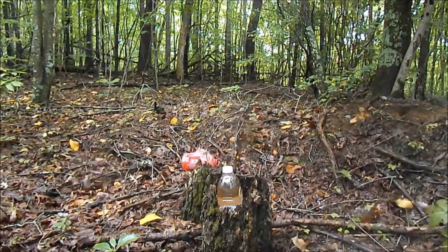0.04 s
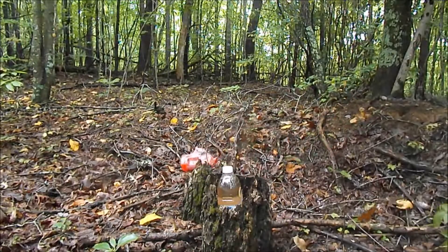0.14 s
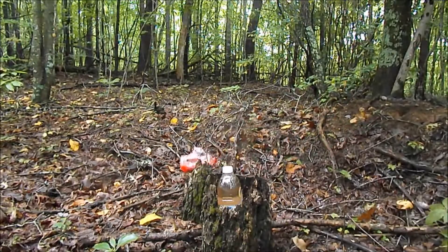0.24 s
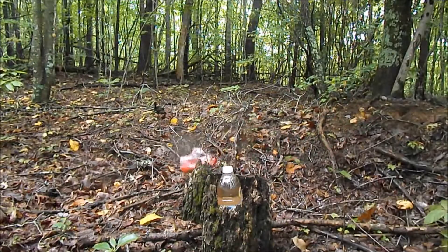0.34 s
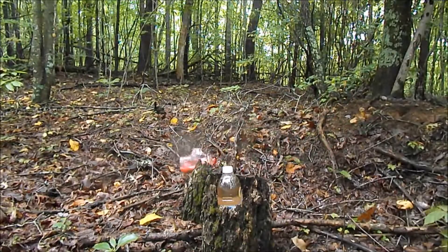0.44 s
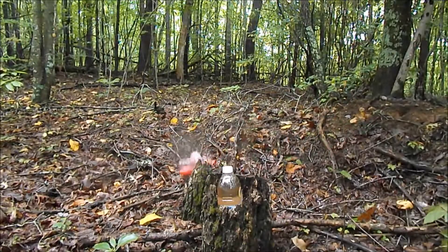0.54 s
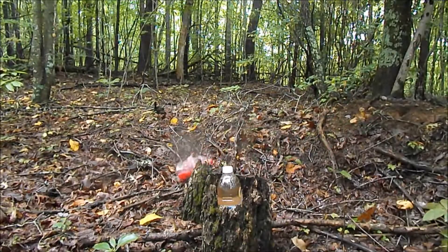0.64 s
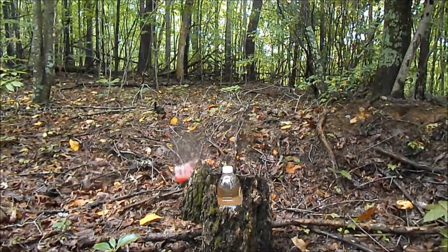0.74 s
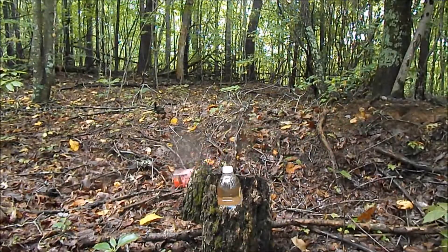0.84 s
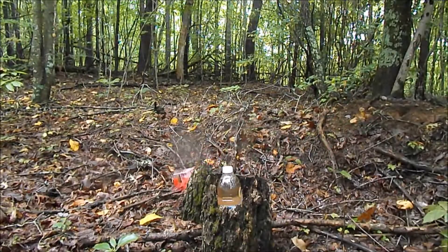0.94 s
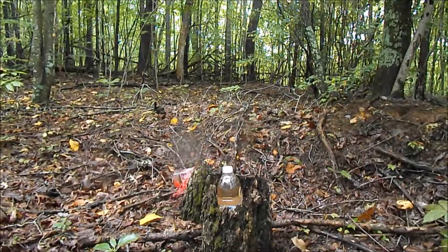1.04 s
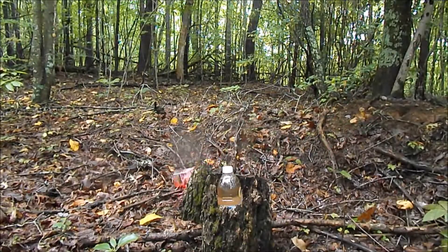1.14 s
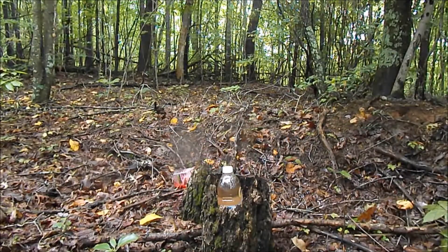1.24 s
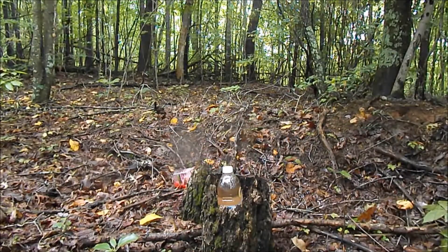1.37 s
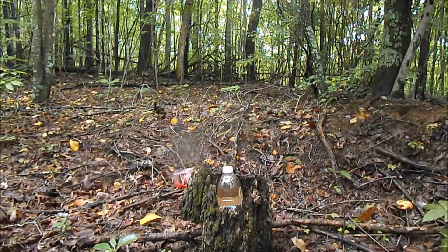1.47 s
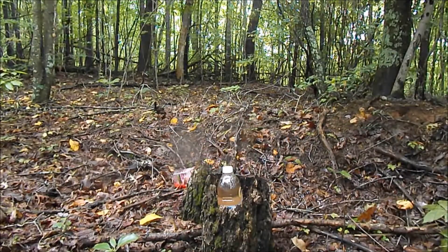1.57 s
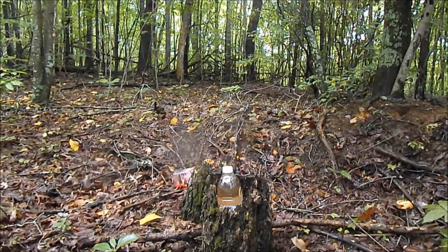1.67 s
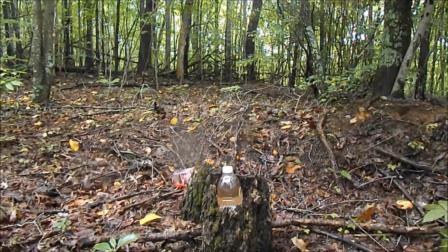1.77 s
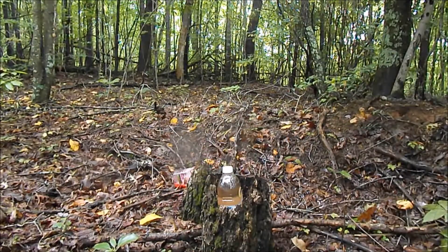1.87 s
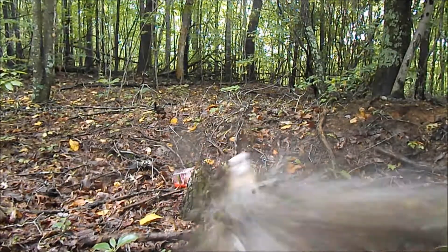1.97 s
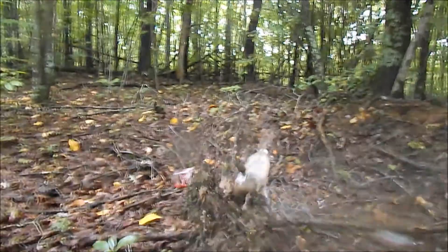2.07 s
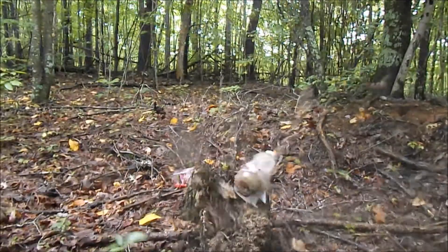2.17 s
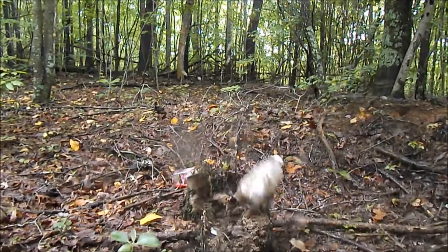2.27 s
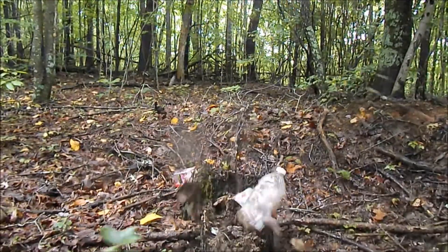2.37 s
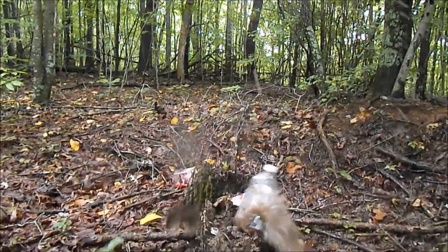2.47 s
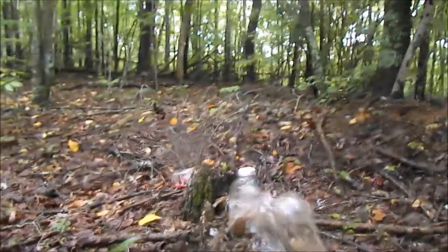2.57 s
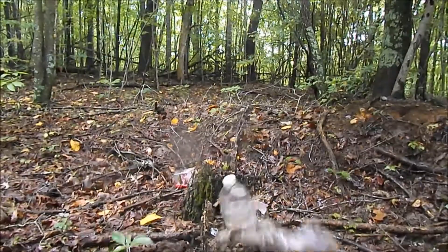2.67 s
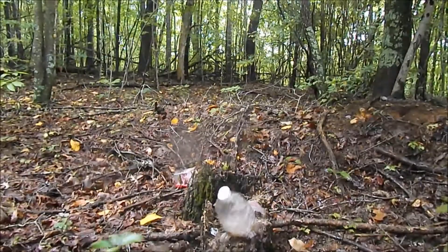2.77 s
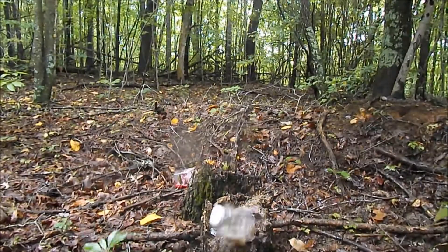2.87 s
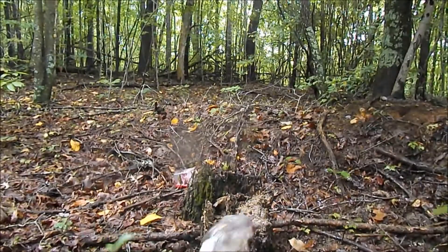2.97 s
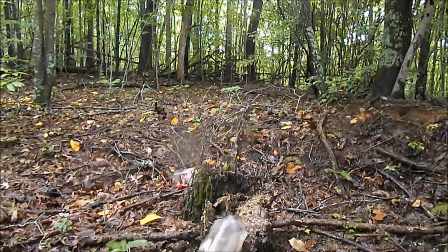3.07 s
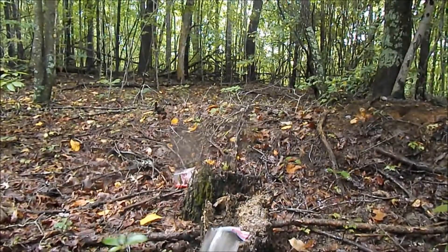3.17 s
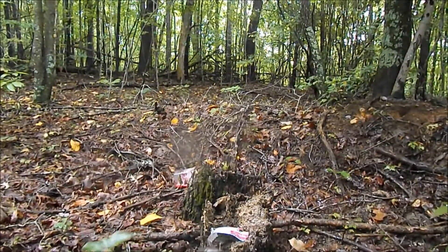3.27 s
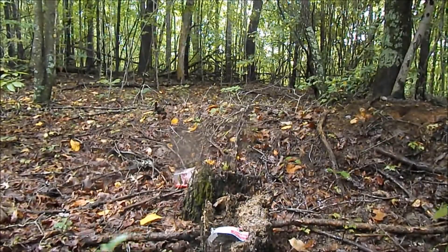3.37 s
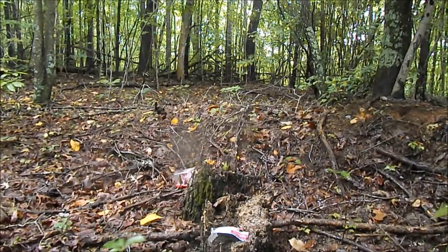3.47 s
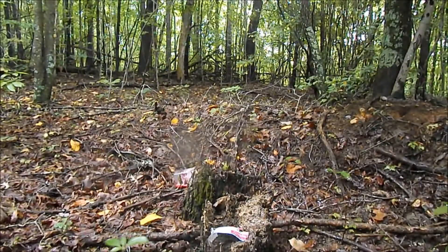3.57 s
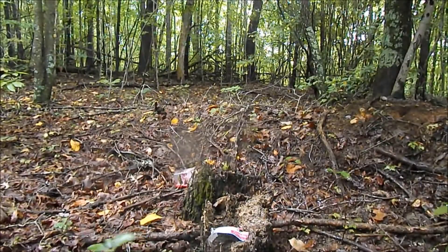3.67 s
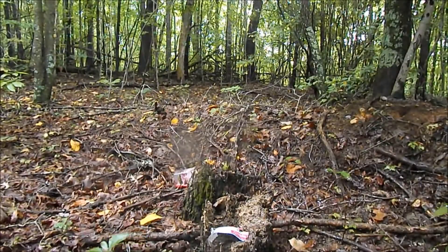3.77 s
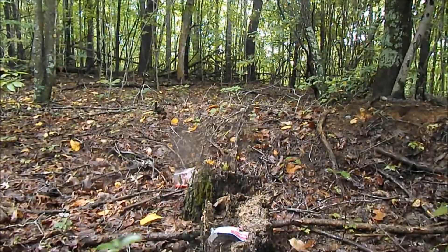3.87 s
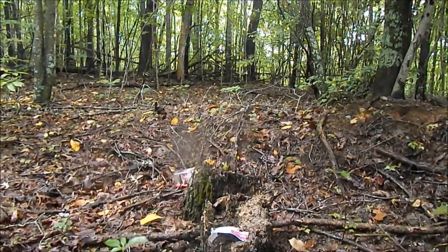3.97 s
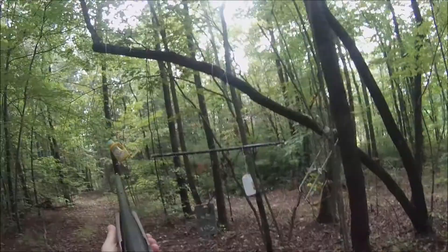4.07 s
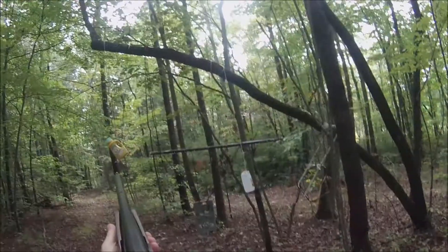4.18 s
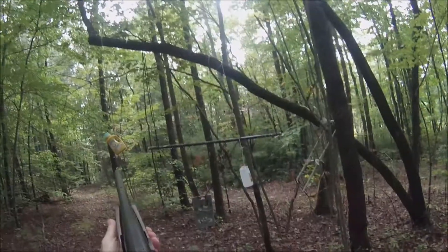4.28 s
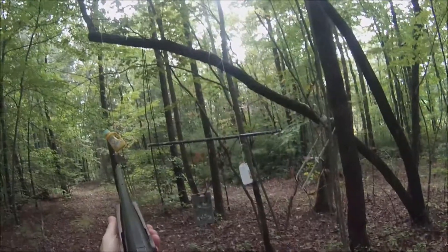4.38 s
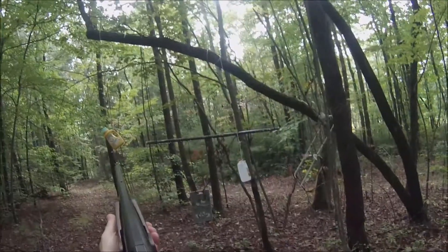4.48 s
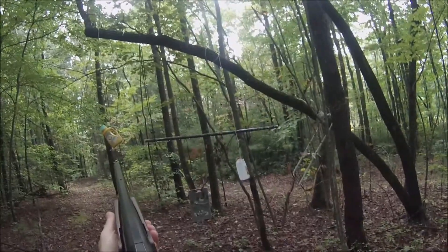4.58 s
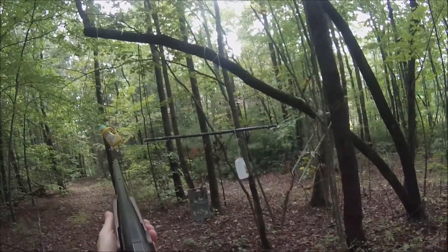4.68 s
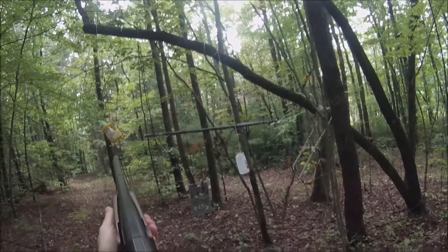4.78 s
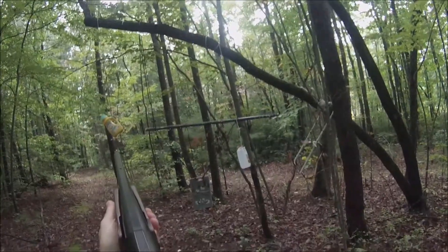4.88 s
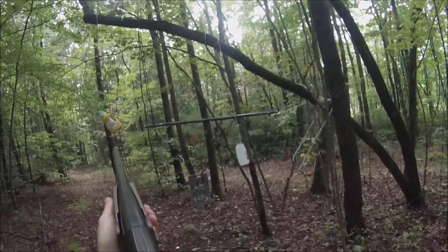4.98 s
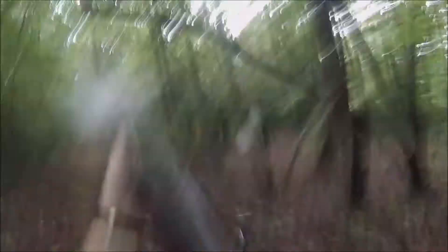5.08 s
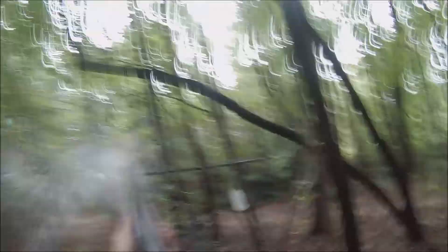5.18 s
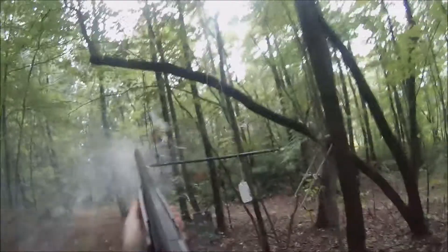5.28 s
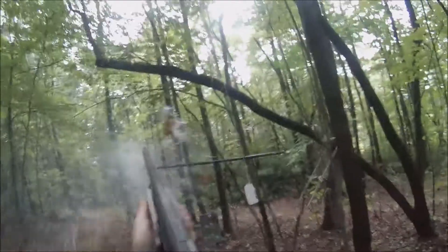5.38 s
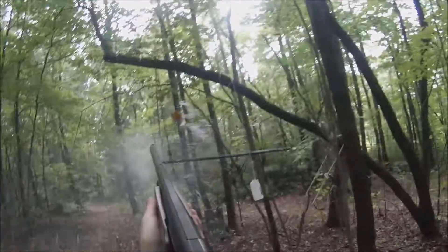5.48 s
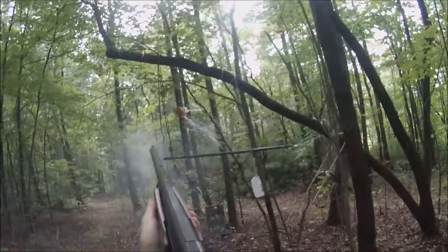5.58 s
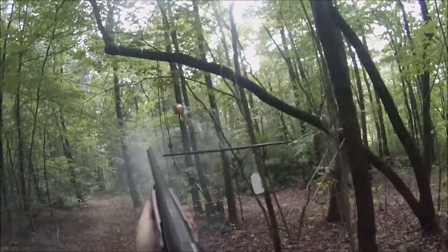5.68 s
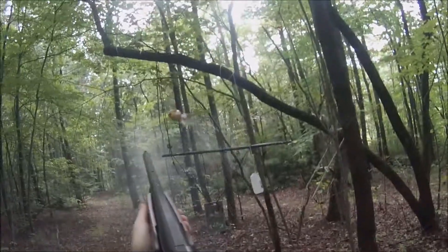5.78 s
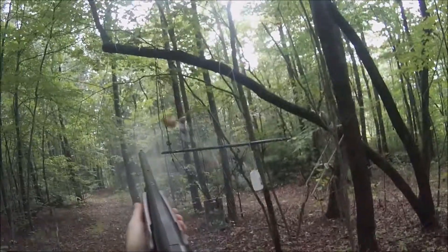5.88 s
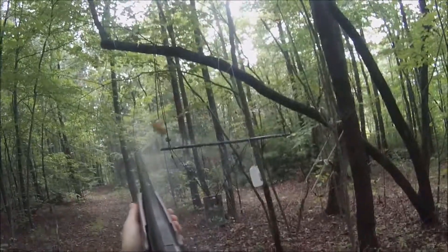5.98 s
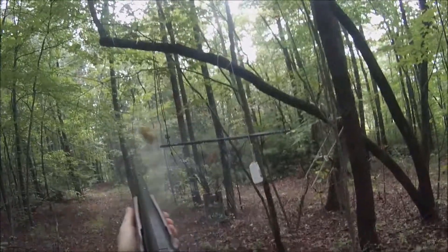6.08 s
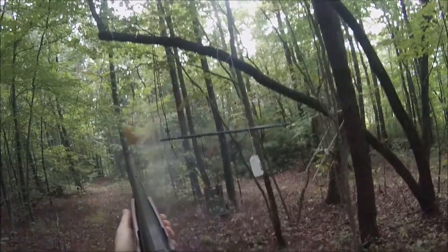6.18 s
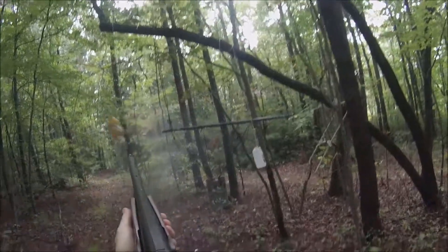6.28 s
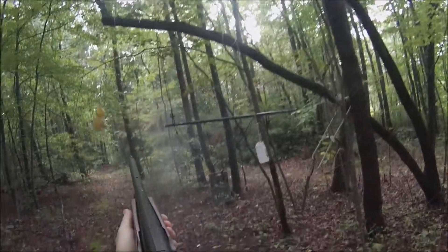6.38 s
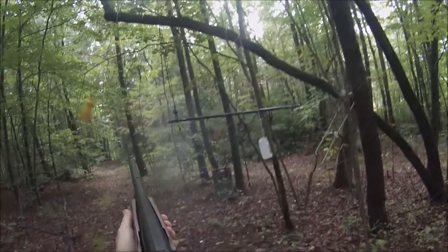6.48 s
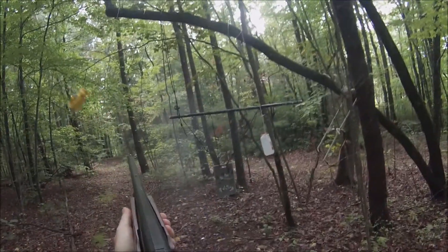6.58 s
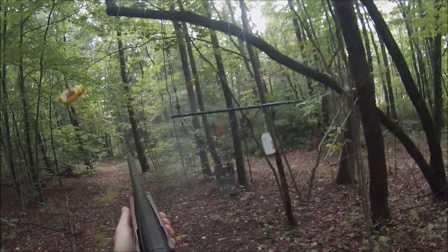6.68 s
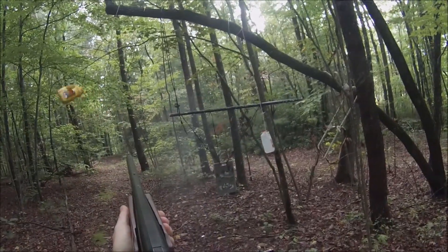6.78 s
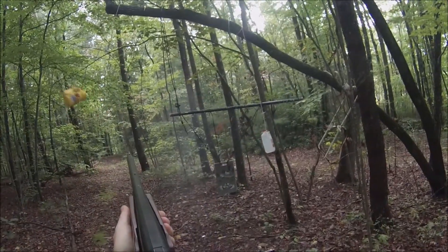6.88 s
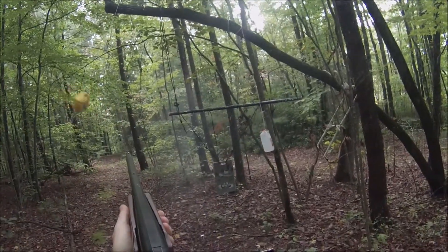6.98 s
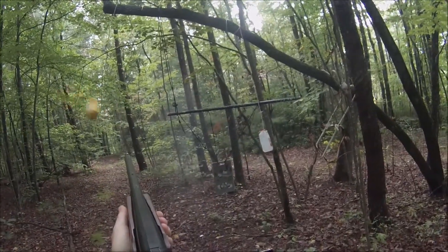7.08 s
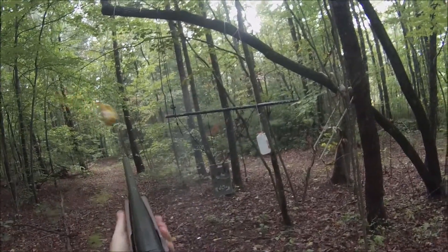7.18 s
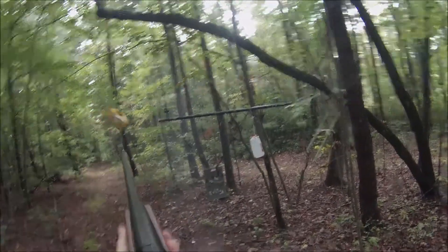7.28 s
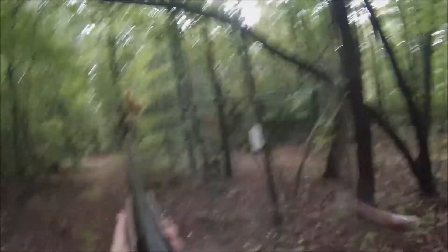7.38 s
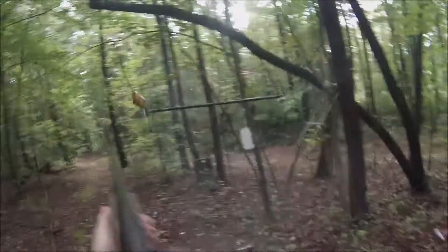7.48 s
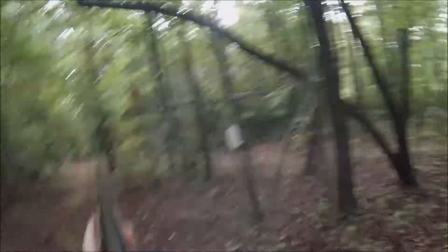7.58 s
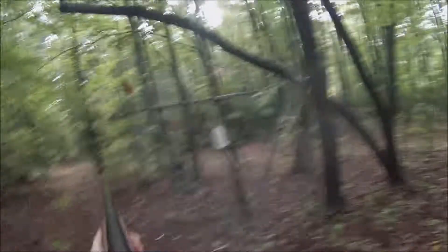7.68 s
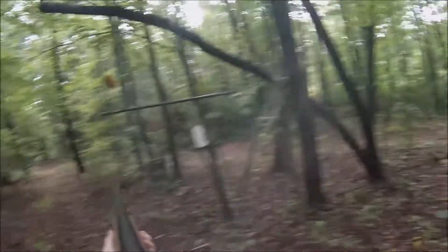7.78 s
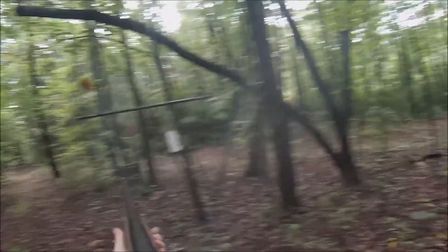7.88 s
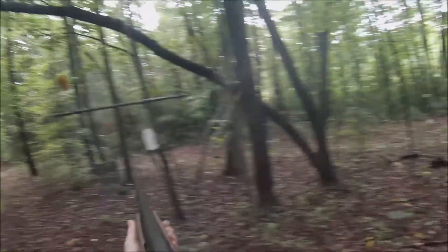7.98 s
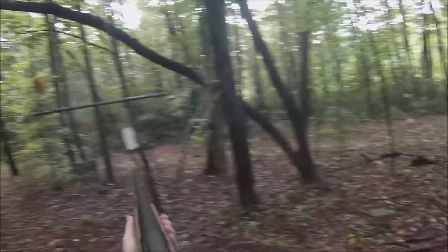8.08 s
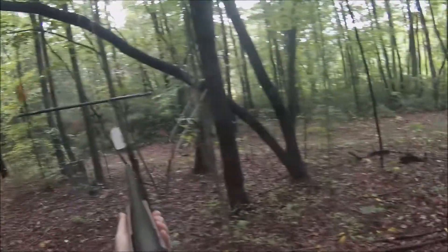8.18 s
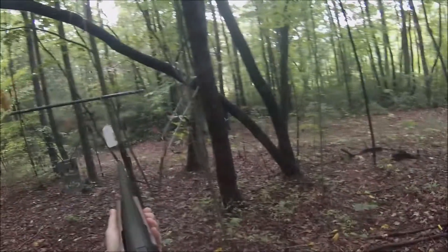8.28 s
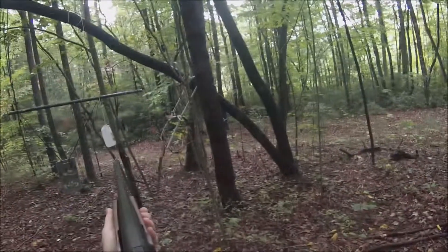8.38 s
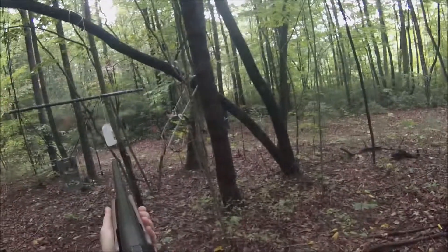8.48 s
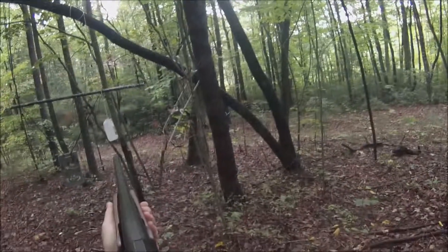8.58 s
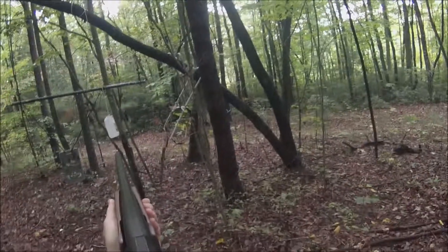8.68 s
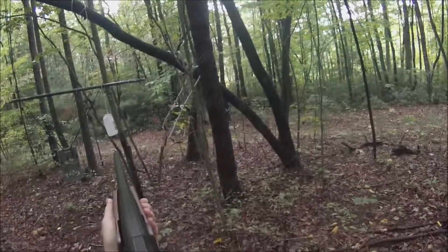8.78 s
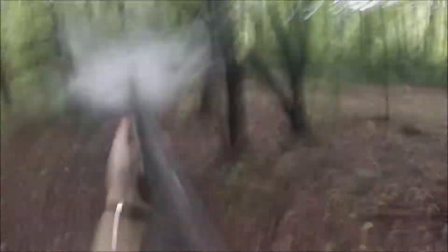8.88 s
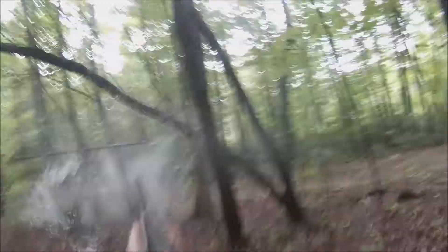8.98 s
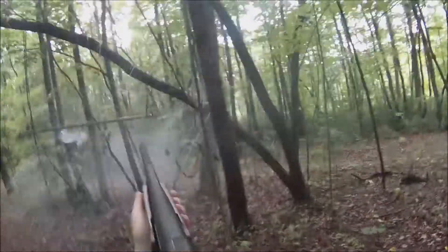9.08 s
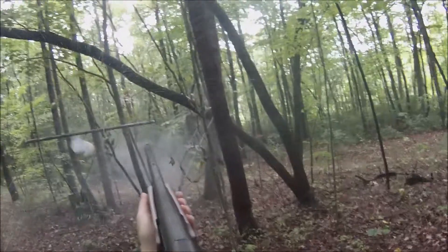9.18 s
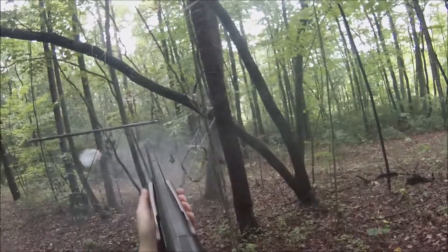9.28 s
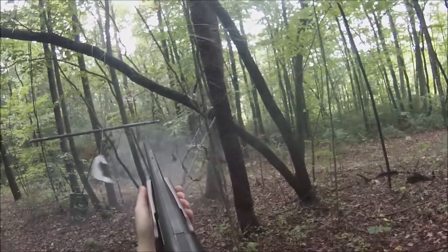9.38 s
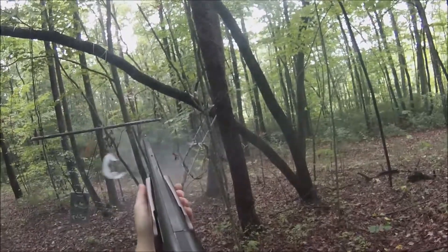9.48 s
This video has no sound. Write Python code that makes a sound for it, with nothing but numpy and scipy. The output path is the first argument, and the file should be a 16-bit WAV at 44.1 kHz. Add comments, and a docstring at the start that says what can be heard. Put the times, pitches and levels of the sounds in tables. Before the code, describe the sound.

Distant shotgun blast with loud echo and debris pattering on leaves, a sharp crack, then two close-up shots rolling hollowly through trees.

```python
"""A wood, heard from two places in turn; a pump shotgun is fired in it. First beside a stump: the echo of one
shot dies, the action is racked, the next shot throws debris and a bottle into the leaves, a sharp crack follows.
Then at the shooter's head: two overloading blasts with the pump worked between them. Shots are pressure pulses
plus gas noise, echoes are coloured grains, steel and debris are noise bursts through resonances, leaves are
ticks; insects are narrow noise over a bed of air."""
import sys
import numpy as np
from scipy import signal
from scipy.fft import rfft, irfft
from scipy.io import wavfile

SR = 44100
rng = np.random.default_rng(int(sys.argv[2]) if len(sys.argv) > 2 else 0)


def wrap_up_sound(samples):
    """Save the sound to the file named by the first command line argument, as 16-bit audio."""
    columns = np.atleast_2d(samples).T
    # keep every value between -1 and 1, then stretch to whole-number steps
    tamed = np.clip(columns, -1, 1)
    steps = np.round(tamed * 32767).astype(np.int16)
    wavfile.write(sys.argv[1], SR, steps)


N = 420713
T = np.arange(N) / SR


def blasts(shots, fronts, gas, low_hz, high_hz, thump_db):
    """Every shot arrives as the same fronts, each a pressure jump with a suction phase and a short roar of gas."""
    pulses, roar = np.zeros(N), np.zeros(N)
    for s, db, weight_db in shots:
        for lag_s, pulse_db, length_ms, roar_db, decay_ms in fronts:
            age = T[:2000] * 1000 / length_ms
            pulse = (1 - age) * np.exp(-age)
            add(pulses, s + lag_s, undb(db + weight_db + pulse_db) * pulse)
            add(roar, s + lag_s, undb(db + roar_db) * burst(decay_ms))
    # the microphone housing rounds each jump into a thud; some deep pressure passes straight through
    thud = 2 * butter(pulses, [low_hz, high_hz], "band")
    deep = butter(butter(pulses, 40, "low", order=1), 130, "low")
    return thud + undb(thump_db) * deep + colour(roar, gas)


# shots: t/s, level/dB, extra level of the pressure pulses/dB
STUMP_SHOTS = [(-0.64, 0, 0), (1.8755, -0.5, -1)]
# direct and reflected fronts: t after shot/s, relative pulse level/dB, pulse length/ms, gas level/dB, gas decay/ms
STUMP_FRONTS = [(0, -20, 1, 3, 3.9), (.008, -18.5, 0.35, -1.5, 8.7), (.019, -1, .23, -18.5, 4)]
# colour of the muzzle gas: f/Hz, relative level/dB
STUMP_GAS = [(40, -2.5), (200, -22.5), (600, 1.5), (2000, 5), (5000, 1), (9000, -3), (15000, -1.5)]


def stump_blasts():
    """Reports of the distant gun."""
    return blasts(STUMP_SHOTS, STUMP_FRONTS, STUMP_GAS, low_hz=200, high_hz=3000, thump_db=7)


# shots: t/s, level/dB, extra level of the pressure pulses/dB
SHOOTER_SHOTS = [(5.0688, 0.3, 1), (8.8549, 1.44, -1.3)]
# fronts from muzzle, ground, near trunks: t after shot/s, relative pulse level/dB, length/ms, gas/dB, decay/ms
SHOOTER_FRONTS = [(0, -13, 0.54, -2.5, 4.2), (.0045, -6, 1, 1, 1.6), (0.0105, -9.5, .85, -27.5, 3.5),
                  (0.0163, -1, .54, -8.5, 1.6), (.0202, -8, .37, -33.5, 5), (.038, -10.5, 0.51, -36, 5),
                  (0.0509, -16, 0.49, -30, 4)]
# colour of the muzzle gas: f/Hz, relative level/dB
SHOOTER_GAS = [(40, -14), (200, -2), (550, -2.5), (1300, -4), (2400, -0.5), (3400, 2), (4400, -8.5),
               (6300, -2.5), (8500, -19), (15000, -21)]


def shooter_blasts():
    """Hard, short blasts close behind the gun."""
    return blasts(SHOOTER_SHOTS, SHOOTER_FRONTS, SHOOTER_GAS, low_hz=329, high_hz=1010, thump_db=18)


def echoes(shots, waves, spectrum, dulling_db_per_octave, mellow_s, dull_s, spread_db):
    """Countless trunks return each shot; the longer the path, the more treble the foliage takes."""
    out, age = np.zeros(N), T[:3 * SR]
    strength = swells([(0, *wave) for wave in waves], age)
    path = np.tanh(age / dull_s) - np.tanh(mellow_s / dull_s)  # 0 at mellow_s
    octave = np.log2(np.clip(np.fft.rfftfreq(len(age), 1 / SR), 500, 16000) / 500)
    for s, db, _ in shots:
        returns = rfft(colour(grains(spread_db, 12000)[:len(age)], spectrum))
        wash = np.zeros(len(age))
        for k in range(6):
            band = irfft(returns * np.maximum(1 - abs(octave - k), 0))
            wash += band * undb(-dulling_db_per_octave * (k - 1) * path)
        add(out, s, undb(db) * strength * wash)
    return out


# near trunks, surrounding stand, far wood: level/dB, attack/s, fall/(dB/s)
STUMP_ECHO = [(-11, 0.061, 33), (-7, .41, 47.5), (-52.5, 1.6, 29.5)]
# colour of the echo: f/Hz, relative level/dB
STUMP_WOOD = [(24, -59.5), (40, -52.5), (218, -38.5), (397, -10.5), (509, -5.5), (606, -3.5), (1050, -4),
              (1160, -2), (1820, 0), (2110, -2), (3140, 1), (4800, -3), (7710, -8.5), (13700, -22),
              (15500, -28.5)]


def stump_echo():
    """Echo as strong as the report; it overloads the microphone."""
    roll = echoes(STUMP_SHOTS, STUMP_ECHO, STUMP_WOOD,
                  dulling_db_per_octave=4.5, mellow_s=0.17, dull_s=0.39, spread_db=0)
    overload = undb(-2)
    return np.clip(roll, -overload, overload)


# near trunks, surrounding stand, far wood: level/dB, attack/s, fall/(dB/s)
SHOOTER_ECHO = [(-17, .002, 280), (-26.5, 0.23, 41), (-39.5, 0.49, 11.44)]
# colour of the echo: f/Hz, relative level/dB
SHOOTER_WOOD = [(59, -54.5), (100, -39.5), (228, -16.5), (287, -7), (403, -0.5), (614, 1), (917, -12),
                (1180, -17), (2130, -13), (3460, -15), (3850, -22), (6260, -19.5), (7250, -26.5),
                (13400, -45), (15500, -48.5)]


def shooter_echo():
    """Long hollow roll."""
    return echoes(SHOOTER_SHOTS, SHOOTER_ECHO, SHOOTER_WOOD,
                  dulling_db_per_octave=4.5, mellow_s=0.22, dull_s=0.8, spread_db=1.5)


# microphone buffeted by the kick, then by rocking forward: t after shot/s, level/dB, attack/s, fall/(dB/s)
RECOIL = [(0, -48, 0.00299, 106), (.09, -46.5, 0.11, 230)]


def recoil():
    """Low noise as the recoil kicks the shooter back and he rocks forward."""
    out = np.zeros(N)
    for s, db, _ in SHOOTER_SHOTS:
        buffet = colour(rng.standard_normal(SR), [(50, -3.5), (120, -6.5), (500, -36), (2000, -80)])
        add(out, s, undb(db) * swells(RECOIL, T[:SR]) * buffet)
    return out


# modes of receiver and barrel: f/Hz, width/Hz, relative level/dB
STEEL_MODES = [(894, 80, -4), (1740, 75, -1), (2020, 85, 0), (2230, 85, -2), (3140, 75, -3), (3390, 80, -4),
               (4450, 140, -1), (5840, 80, -3), (6100, 130, -2), (7530, 90, -7), (9860, 150, -7),
               (12200, 180, -8)]


def action(strikes, rubbing, spectrum, ring_db):
    """Bolt, lifter and slide strike and rub; each blow lands elsewhere and favours other modes of the receiver."""
    sound = rubbing + undb(ring_db) * resonate(rubbing, STEEL_MODES)
    rings = np.array([undb(db) * mode(hz, width) for hz, width, db in STEEL_MODES])
    mode_shares = rng.standard_normal((len(strikes), len(STEEL_MODES)))
    for (s, db, decay_ms), shares in zip(strikes, mode_shares):
        contact = undb(db) * burst(decay_ms)
        add(sound, s, contact + undb(ring_db) * through(contact, unit(shares @ rings)))
    return colour(sound, spectrum)


def sliding(strokes, spread_db):
    """Stick-slip of the fore-end on its tube: it grows as the hand speeds up and dies at the stop."""
    gain = np.zeros(N)
    for s, length_s, db in strokes:
        speed = np.clip((T - s) / length_s, 0, 1)
        past_stop_s = np.maximum(T - s - length_s, 0)
        gain += undb(db) * speed ** 2 * undb(-200 * past_stop_s)  # falls 200 dB/s
    return gain * grains(spread_db, 3000)


# colour of the tails that nearer trunks return: f/Hz, relative level/dB
ACTION_ECHO = [(200, -36.5), (500, -16.5), (1300, -11), (2400, -1), (3700, 5), (5500, 2), (8000, -0.5),
               (13000, -9), (15500, -16.5)]


def thicket(x, low_t60_s, high_t60_s, build_s, treble_db, split_hz, spectrum=ACTION_ECHO):
    """The nearer trunks answer small bright sounds with a hissing tail whose treble dies first."""
    t = T[:SR]
    build = 1 - np.exp(-t / build_s)
    low = diffuse(x, np.exp(-np.log(1000) * t / low_t60_s) * build)
    high = diffuse(x, np.exp(-np.log(1000) * t / high_t60_s) * build)
    low = butter(low, split_hz, "low", order=3)
    high = undb(treble_db) * butter(high, split_hz, "high", order=3)
    return colour(low + high, spectrum)


# barrel and magazine tube: f/Hz, width/Hz, relative level/dB
TUBE_MODES = [(2220, 55, -4), (2900, 150, -10), (3720, 160, 0), (4040, 76, -4), (4400, 60, -6)]


def singing(rack, t60_s):
    """The tubes' ring, drawn out by the wood; thin steel radiates no bass."""
    ring = resonate(diffuse(rack, np.exp(-np.log(1000) * T[:SR] / t60_s)), TUBE_MODES)
    return butter(ring, 1500, "high", order=3)


# steel parts meeting: t/s, level/dB, decay/ms
STUMP_RACK = [(.5768, -31.5, 7.1), (.6187, -21.5, 10), (.638, -14, 17.5), (.6445, -8.5, 9.1),
              (.8672, -23.5, 17), (.893, -21.5, 13), (.916, -17, 18), (.9285, -7.5, 5)]
# fore-end back, then forward: t/s, length/s, rubbing level/dB
STUMP_STROKES = [(.612, 0.023, -17), (.82, .105, -27.5)]
# colour of the action: f/Hz, relative level/dB
STUMP_ACTION = [(59, -65), (100, -75), (306, -68), (541, -12), (898, -8), (1040, -12), (1660, -5),
                (1960, -0.5), (3120, -3.5), (6000, -1.5), (7560, -4), (12300, -2.5), (15500, -12)]
# fore-end against its rear stop: t/s, level/dB, f/Hz, width/Hz, decay/ms
STUMP_THUMP = [(.643, -15, 780, 550, 7)]


def stump_action():
    """Distant racking with the trunks' tail and the ring of the tubes."""
    rubbing = sliding(STUMP_STROKES, spread_db=0.3)
    rack = action(STUMP_RACK, rubbing, STUMP_ACTION, ring_db=-15.5) + knocks(STUMP_THUMP)
    tail = thicket(rack, low_t60_s=0.79, high_t60_s=0.55, build_s=0.011, treble_db=1.5, split_hz=5000)
    return rack + undb(-2) * tail + undb(-9) * singing(rack, t60_s=0.9)


# steel parts meeting: t/s, level/dB, decay/ms
SHOOTER_RACK = [(7.190, -33.5, 6.5), (7.2177, -22, 1.7), (7.228, -21.5, 3.4), (7.2537, -24.5, 2.3),
                (7.261, -21, 7.7), (7.2746, -12, 6), (7.286, -10, 3.3), (7.295, -12, 2),
                (7.3025, -10.5, 5.8), (7.3375, -18, 7.3), (7.358, -23.5, 3.5), (7.370, -25, 3.7),
                (7.4497, -39.5, 6), (7.465, -35.5, 8.9), (7.4981, -13, 1.5), (7.519, -17, 4.1),
                (7.541, -13, 5.3), (7.5545, -9.5, 4.9)]
# fore-end back, then forward: t/s, length/s, rubbing level/dB
SHOOTER_STROKES = [(7.175, .11, -32.5), (7.485, 0.029, -33)]
# colour of the action: f/Hz, relative level/dB
SHOOTER_ACTION = [(35, -70.5), (60, -28), (291, -16), (413, -5), (599, -0.5), (999, -9), (1200, -15.5),
                  (1740, -5.5), (1870, -11), (2310, -3.5), (4120, -9.5), (5980, -2.5), (8670, -16),
                  (13500, -22.5), (15500, -26.5)]
# hands, stock, spent shell: t/s, level/dB, f/Hz, width/Hz, decay/ms
HANDLING = [(4.532, -49.5, 750, 401, 4.3), (4.658, -52, 701, 500, 6.2), (7.2175, -20.5, 2500, 600, 2.4),
            (7.303, -13.5, 1950, 800, 5.4), (7.556, -49, 129, 150.4, 15), (7.702, -43.5, 650, 300, 5.3),
            (7.901, -50.5, 4500, 7000, 4.4), (7.9211, -48.5, 1970, 4980, 10.3),
            (8.846, -28.5, 1106, 1524, 3.3)]
HAMMER_LEAD_S, HAMMER_DB, HAMMER_DECAY_MS = 0.0268, -35, 2.7


def shooter_action():
    """Close, dry racking; the hammer falls just before each shot."""
    hammer = [(s - HAMMER_LEAD_S, HAMMER_DB, HAMMER_DECAY_MS) for s, *_ in SHOOTER_SHOTS]
    rubbing = sliding(SHOOTER_STROKES, spread_db=1.2)
    rack = action(SHOOTER_RACK + hammer, rubbing, SHOOTER_ACTION, ring_db=-11) + knocks(HANDLING)
    tail = thicket(rack, low_t60_s=0.67, high_t60_s=0.455, build_s=0.012, treble_db=-0.5, split_hz=6900)
    return rack + undb(-29.5) * tail + undb(-30.5) * singing(rack, t60_s=0.65)


# one hard crack and its reflections: t/s, level/dB, f/Hz, width/Hz, decay/ms
CRACK = [(3.9987, 7.5, 4090, 2720, 0.82), (4.0035, -10, 3900, 1400, 4), (4.0065, -13.5, 2590, 220, 4.4),
         (4.008, -21.5, 1710, 2500, 6.3)]
# colour of its tail: f/Hz, relative level/dB
CRACK_ECHO = [(200, -29.5), (1900, -20.5), (2650, -2), (4200, 4), (5200, -3.5), (7000, -11.5),
              (15000, -34.5)]


def hard_crack():
    """Very short noise bursts with a tail from the trunks."""
    crack = knocks(CRACK)
    tail = thicket(crack, low_t60_s=0.47, high_t60_s=0.38, build_s=0.018, treble_db=4, split_hz=5600,
                   spectrum=CRACK_ECHO)
    return crack + undb(-18.5) * tail


def knocks(rows):
    """Brief crunching contacts, each into one resonance with steep flanks."""
    out = np.zeros(N)
    for s, db, hz, width_hz, decay_ms in rows:
        low_hz = np.hypot(hz, width_hz / 2) - width_hz / 2
        high_hz = min(low_hz + width_hz, SR / 2 - 100)
        ring = unit(butter(signal.unit_impulse(4096), [low_hz, high_hz], "band"))
        add(out, s, undb(db) * through(burst(decay_ms), ring))
    return out


def patter(showers, spectrum, spread_db):
    """Crumbs tap leaves of many sizes; each size gives short ticks at its own pitch."""
    ticks = np.zeros(N)
    for hz in np.geomspace(700, 13000, 7):
        ticks += through(grains(spread_db, 600), mode(hz, hz / 3, size=512)) * np.sqrt(hz)
    ticks = colour(ticks, spectrum)
    return swells(showers, T) * ticks / np.std(ticks)


# larger clods, bark and the bottle coming down: t/s, level/dB, f/Hz, width/Hz, decay/ms
LANDINGS = [(2.4342, 0.5, 2700, 899, 3.3), (2.445, -18, 433, 509, 14), (2.447, -11, 1180, 1800, 6.7),
            (2.54, -39, 160, 150, 19), (2.7225, -19.5, 4600, 8000, 22), (2.733, -18, 3630, 4500, 10.6),
            (2.8537, -27, 2380, 2400, 6.5), (2.8907, -27.5, 3720, 4000, 4), (2.9655, -24, 2900, 4500, 2.9),
            (3.0054, -28.5, 7023, 1500, 4.4), (3.085, -29, 790, 900, 6.1), (3.1072, -24, 3600, 4000, 3.4),
            (3.1343, -16, 4170, 8000, 2.2), (3.1566, -20, 3400, 3000, 14), (3.16, -31.5, 530, 885, 16),
            (3.2015, -20.5, 3500, 6000, 5.3), (3.305, -24.5, 2800, 3470, 20),
            (3.319, -23.5, 3000, 4000, 11), (3.358, -26.5, 10030, 7000, 18),
            (3.4145, -32.5, 2240, 1838, 12), (3.473, -30.5, 550, 220, 11), (3.50, -35.5, 2060, 900, 10),
            (3.6305, -37.5, 6100, 6000, 3.5), (3.6669, -40, 4200, 1500, 3.7)]
# fine dirt, thrown low and high by each shot: start t/s, level/dB, attack/s, fall/(dB/s)
DIRT_SHOWERS = [(-.3, -36.5, 0.36, 20.5), (.5, -44.5, 0.43, 34), (2.3, -26.5, 0.32, 44),
                (2.93, -30.5, 0.37, 63.5)]
# colour of dry leaves: f/Hz, relative level/dB
LEAVES = [(200, -21), (600, -5), (2800, 2.5), (6000, -1.5), (10000, -4.5), (15000, -9.5)]


def debris():
    """Heavy pieces knock, fine dirt patters."""
    return knocks(LANDINGS) + patter(DIRT_SHOWERS, LEAVES, spread_db=-1)


# shreds of the target: start t/s, level/dB, attack/s, fall/(dB/s)
SIFTING = [(6.01, -56, 0.35, 22)]
# colour of their ticks: f/Hz, relative level/dB
SHREDS = [(1000, -6.5), (2000, -2), (4200, 4), (6300, 7.5), (9000, -5), (13500, -7), (15500, -18)]


def sifting_shreds():
    """Shreds sift down through the leaves as fine ticks."""
    return patter(SIFTING, SHREDS, spread_db=-1)


def air(spectrum, db, insect_db, insect_hz):
    """A soft bed of moving leaves with the narrow buzz of insects over it."""
    sway_db = np.interp(T, np.linspace(0, T[-1], 80), rng.standard_normal(80))
    ring = mode(insect_hz, 700)
    insects = through(rng.standard_normal(N), unit(through(ring, ring)))  # resonated twice
    leaves = undb(db + 0.4 * sway_db) * colour(rng.standard_normal(N), spectrum)
    return leaves + undb(insect_db + sway_db[::-1]) * insects


# colour of the air: f/Hz, relative level/dB
STUMP_AIR = [(35, -87), (60, -63.5), (87, -31), (278, -19.5), (351, -9), (394, -11), (464, -4), (673, -2.5),
             (1050, -7.5), (1200, -6.5), (2100, -11.5), (2410, -8), (4030, -14.5), (5320, -11),
             (15500, -23.5)]


def stump_air():
    """Leaves and insects around the stump."""
    return air(STUMP_AIR, db=-48, insect_db=-57.5, insect_hz=5200)


# colour of the air: f/Hz, relative level/dB
SHOOTER_AIR = [(15, -30), (25, -3.5), (107, -8.5), (178, -7), (378, -13.5), (482, -10.5), (582, -11),
               (648, -13.5), (919, -20.5), (1410, -21), (2010, -24.5), (4750, -31.5), (5140, -46),
               (6730, -32), (15500, -45.5)]
# the air dips after the racking, then swells as the shooter turns: t/s, level change/dB, half length/s
AIR_SHIFTS = [(7.826, -6.5, 0.24), (8.35, 3.5, 0.3)]


def shooter_air():
    """Leaves and insects around the shooter; the air dips after the racking, then swells as the shooter turns."""
    shift_db = sum(db * np.exp(-((T - s) / half_s) ** 2) for s, db, half_s in AIR_SHIFTS)
    return undb(shift_db) * air(SHOOTER_AIR, db=-58.5, insect_db=-74.5, insect_hz=5400)


# one swell: start t/s, level/dB, attack/s, fall/(dB/s)
DRONE = [(4.0, -60.5, 0.64, 11)]


def low_drone():
    """Narrow noise at 181 Hz swells once and sinks back to a faint floor."""
    rest_db = -75
    return np.hypot(swells(DRONE, T), undb(rest_db)) * through(rng.standard_normal(N), mode(181, 30))


def at_stump():
    """Downrange: the gun is some way off, so its echo is as loud as its report, and debris lands close by."""
    filtered = stump_echo() + stump_action() + debris() + hard_crack() + stump_air()
    # the report pushes deep bass past this microphone's wind filter
    return stump_blasts() + butter(filtered, 150, "high", order=3)


def at_shooter():
    """Behind the gun: hard short blasts, a long hollow roll, and the action close and dry."""
    shots = shooter_blasts() + shooter_echo() + recoil()
    return shots + shooter_action() + sifting_shreds() + shooter_air() + low_drone()


def scattered(x, side_db, db_per_octave, smear_s):
    """The part of x that differs between the channels; it grows with pitch, up to side_db in the top octave."""
    out = np.zeros(N)
    for octave in range(4):  # downwards from the top
        edges_hz = np.array([1, 2]) * SR / 5.6 / 2 ** octave
        band = unit(butter(signal.unit_impulse(512), edges_hz, "band", order=3))
        smeared = diffuse(butter(x, edges_hz, "band", order=3), np.exp(-T[:2000] / smear_s))
        out += undb(side_db - db_per_octave * octave) * through(smeared, band)
    return out


def undb(db):
    """Decibels to gain."""
    return 10 ** (np.asarray(db) / 20)


def unit(h):
    """A response scaled to pass white noise at the same power."""
    return h / np.sqrt(np.sum(h ** 2))


def through(x, h):
    """The sound x after the impulse response h."""
    return signal.oaconvolve(x, h)[:len(x)]


def butter(x, hz, kind, order=2):
    """Plain low-, high- or band-pass."""
    return signal.sosfilt(signal.butter(order, hz, kind, fs=SR, output="sos"), x)


def colour(x, points, size=4096):
    """Causal minimum-phase filter through (f/Hz, level/dB) points, scaled to unit noise power."""
    hz, db = np.transpose(points)
    log_hz = np.log(np.fft.rfftfreq(size, 1 / SR) + 1)
    log_gain = np.log(undb(np.interp(log_hz, np.log(hz), db)))
    cepstrum = irfft(log_gain) * (1 + np.sign(size // 2 - np.arange(size)))  # folded to positive time
    return through(x, unit(irfft(np.exp(rfft(cepstrum)))))


def mode(hz, width_hz, size=4096):
    """The ring of one resonance: a decaying sine."""
    t = T[:size]
    return unit(np.exp(-np.pi * width_hz * t) * np.sin(2 * np.pi * hz * t))


def resonate(x, modes):
    """The sound x through (f/Hz, width/Hz, level/dB) resonances."""
    return through(x, unit(sum(undb(db) * mode(hz, width) for hz, width, db in modes)))


def burst(decay_ms, size=6000):
    """Noise that starts at once and dies away."""
    return rng.standard_normal(size) * np.exp(-T[:size] * 1000 / decay_ms)


def grains(spread_db, per_s):
    """Random clicks of unequal size, at unit power."""
    size = undb(spread_db * np.minimum(rng.exponential(size=N), 5))
    x = rng.standard_normal(N) * size * (rng.random(N) < per_s / SR)
    return x / np.std(x)


def diffuse(x, decay):
    """Noise that carries the energy of x, spread in time along a decay."""
    energy = np.abs(through(x ** 2, unit(decay) ** 2))
    return np.sqrt(energy) * rng.standard_normal(N)


def swell(t, attack_s, fall_db_per_s):
    """Gain that rises from t = 0 through the attack and then falls steadily in dB."""
    rise = np.sin(np.pi / 2 * np.clip(t / attack_s, 0, 1))
    return rise * undb(-fall_db_per_s * np.maximum(t - attack_s, 0))


def swells(rows, t):
    """Joint gain of overlapping (start t/s, level/dB, attack/s, fall/(dB/s)) swells."""
    return np.sqrt(sum((undb(db) * swell(t - s, attack_s, fall)) ** 2 for s, db, attack_s, fall in rows))


def add(out, s, x):
    """Mix x into out from time s on."""
    start = int(round(s * SR))
    x = x[max(-start, 0):N - start]
    out[max(start, 0):max(start, 0) + len(x)] += x


def scene():
    """The stump is heard in narrow stereo, a little from the right; then the shooter's place in mono."""
    cut_s = 4.133
    stump = at_stump()
    side = scattered(stump, side_db=-10.5, db_per_octave=11.5, smear_s=0.005)
    pair = np.array([np.roll(stump + side, 1), stump - side])  # left lags by one sample
    return np.where(T < cut_s, pair, at_shooter())


def record(dry):
    """The blasts clip near full scale; the top is cut."""
    low_pass = signal.ellip(10, 0.2, 80, 15400, fs=SR, output="sos")
    return signal.sosfilt(low_pass, np.clip(dry, -0.95, 0.95))


dry = scene()
out = record(dry)
wrap_up_sound(out)
```